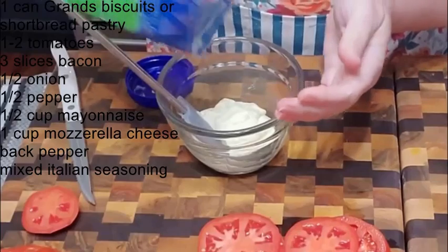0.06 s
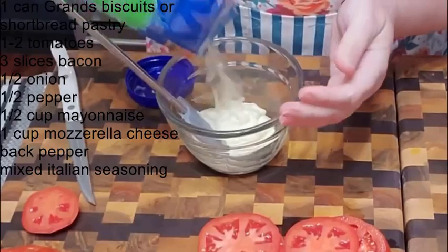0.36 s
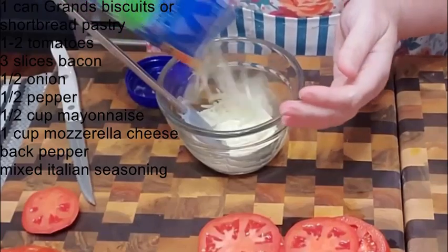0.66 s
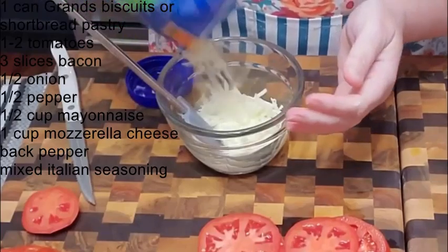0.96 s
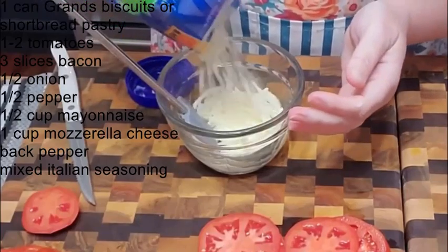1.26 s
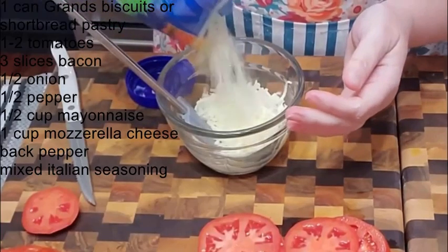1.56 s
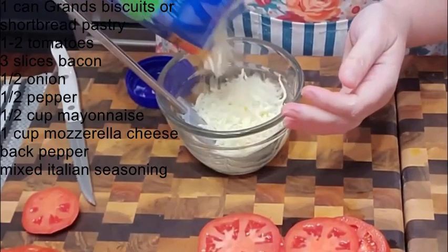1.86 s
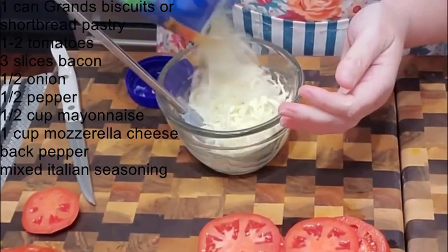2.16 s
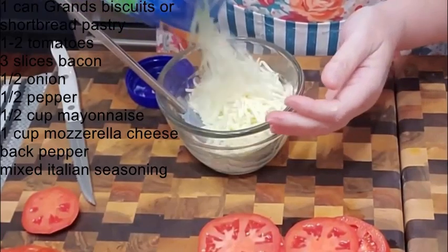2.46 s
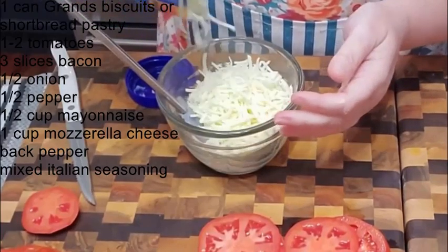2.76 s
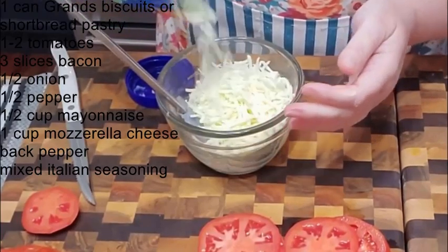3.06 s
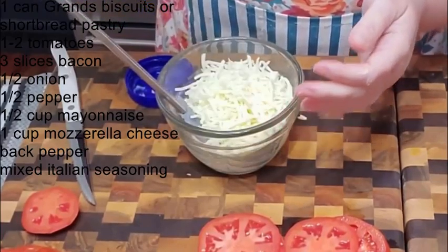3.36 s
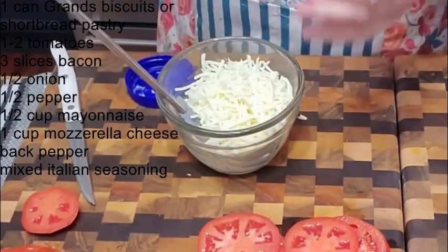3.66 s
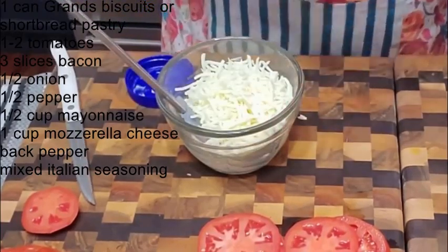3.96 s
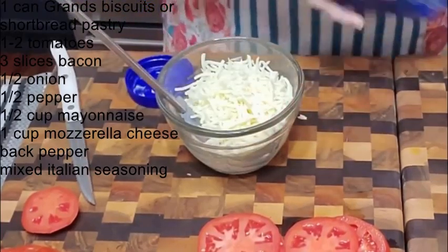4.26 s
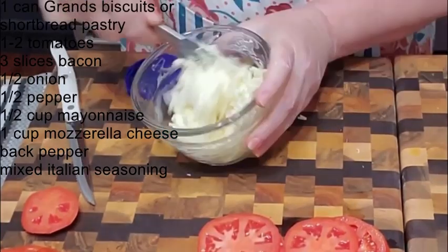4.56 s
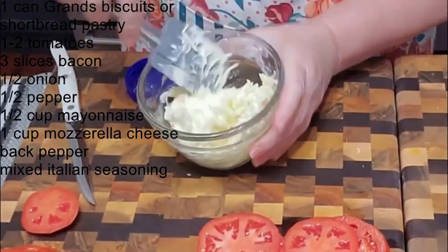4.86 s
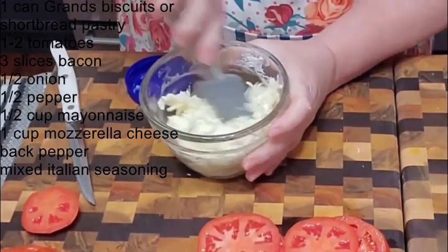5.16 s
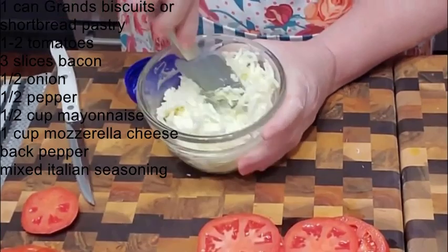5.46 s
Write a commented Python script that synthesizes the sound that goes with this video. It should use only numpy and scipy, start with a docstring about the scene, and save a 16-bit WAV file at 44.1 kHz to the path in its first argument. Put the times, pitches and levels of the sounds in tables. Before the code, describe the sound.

A kitchen appliance hums low and steady throughout. From the start until about 3.3 seconds, shredded cheese is shaken from a plastic bag close to the microphone: shreds slide and patter softly into a glass bowl in uneven surges, the plastic crinkles and pops, and a few clumps land with tiny thuds. The pouring thins out after 2.5 seconds. From about 3.5 seconds the bag is crumpled, with sharp crackles that peak just after 4 seconds, and it is set down with a crackly thud near 4.5 seconds. Faint sticky spatula strokes begin right after. At about 5 seconds the glass bowl knocks on a wooden board, the loudest sound, ringing briefly with a little room echo. The spatula keeps stirring the creamy mixture with a soft wet crackle and small smacks until the end, around 5.6 seconds.

```python
"""Shredded cheese is shaken from a plastic bag into a glass bowl of mayonnaise: shreds slide down the
film and patter, clumps thud, creases pop. The bag is crumpled and laid down close by. The tilted bowl
knocks on a wooden board and rings; a spatula stirs the sticky mixture with a wet crackle.
A kitchen appliance hums throughout."""
import sys
import numpy as np
from scipy import signal
from scipy.fft import rfft, irfft, next_fast_len
from scipy.io import wavfile

SR = 44100
rng = np.random.default_rng(int(sys.argv[2]) if len(sys.argv) > 2 else 0)


def file_out(sig):
    """Save sig as 16-bit WAV at sys.argv[1]."""
    # one column per channel
    cols = np.atleast_2d(sig).T
    # limit, then scale
    lim = np.clip(cols, -1, 1)
    pcm = np.round(lim * 32767).astype(np.int16)
    wavfile.write(sys.argv[1], SR, pcm)


N = 247092
TIME_S = np.arange(N) / SR

# stereo field: freq_hz, correlation
STEREO_CORRELATION = [(60, 0.8), (130, 1), (290, 0.69), (640, 0.62), (1400, 0.17), (3100, 0.095),
                      (6800, .02)]
# kitchen decay: freq_hz, t60_s
KITCHEN_T60 = [(150, 0.56), (400, 0.52), (1000, 0.61), (2800, 0.59), (10000, .3)]
# echo spectrum of the handling: freq_hz, level_db
ECHO_SPECTRUM = [(200, 7.5), (2000, 5.0), (12000, -4)]

# appliance air rush: freq_hz, level_db
AIR_SPECTRUM = [(15, -27), (25, -11.5), (123, -10.5), (141, -12), (185, -15), (309, -13.5), (754, -26),
                (988, -25.5), (1070, -32.5), (1160, -27.5), (1890, -24.5), (2050, -32), (2550, -32.5),
                (5140, -43), (16000, -46)]
# air boom around the main hum: centre_hz, width_hz, lift_db
AIR_BOOM = [(108, 20, 12)]
# motor hum: pitch_hz, level_db, wander_ratio
HUM_LINES = [(56.6, -59, .3), (60.5, -54, .2), (110.4, -47, 0.11), (182, -64, .6), (297.7, -59.5, 0.28),
             (360, -62.5, 1)]

# wet crackle: freq_hz, level_db
STIR_SPECTRUM = [(300, -15), (550, 0.5), (1300, -9), (1900, 0.5), (3300, -6), (3900, -4.5), (4400, -4.5),
                 (5400, -11), (7000, -14), (8500, -10), (16000, -16)]
# spatula strokes, and the bright wash after the bowl's knock: peak_s, hold_s, body_db, fizz_db
STROKES_AND_WASH = [(4.658, 0.009, -75, -68), (4.793, 0.038, -71, -69.5), (5.03, 0.11, -58, -64),
                    (5.236, 0.095, -60, -56.5), (5.505, 0.019, -55.5, -53.5)]
# sticky threads parting: start_s, level_db, centre_hz
THREAD_SMACKS = [(4.6533, -40.5, 9110), (5.2663, -40, 4020), (5.473, -54, 3430), (5.4994, -28, 7850),
                 (5.531, -29, 4340)]

# bowl landing and rocking once: start_s, level_db, low_hz, high_hz
BOWL_IMPACTS = [(4.968, -0.5, 887, 1520), (4.9713, -11, 870, 1290)]
# bowl and board modes: pitch_hz, relative_db, t60_s
BOWL_MODES = [(90, 2, 0.2), (166, -15.5, 0.86), (409, -3, 0.42), (600, -10, 0.41), (700, -8.5, 0.41),
              (759, -9.5, 0.64), (842, -1, 0.45), (947, 0, 0.56), (980, -2, 0.27), (1150, -13, 0.5),
              (1226, -8, 0.42), (1253, -8, 0.59), (1370, -10, 0.32), (1450, -25, 0.33), (1550, -7, 0.44),
              (1584, -3.5, 0.47), (1750, -17, 0.31), (2190, -19, .35), (2390, -4, 0.084), (2900, -27, 0.3),
              (2950, -21.5, 0.41), (3050, -20, 0.35)]
# echo spectrum of the knock: freq_hz, level_db
KNOCK_ECHO_SPECTRUM = [(70, -16), (100, -21), (140, -7.5), (330, -8.5), (430, -1.5), (750, -6), (930, 4),
                       (1100, -5), (1300, -7), (1700, -3), (2050, -18), (3100, -20), (3350, -31),
                       (9000, -49)]

# crumpling film: freq_hz, level_db
CRUMPLE_SPECTRUM = [(41, -38), (70, -2), (115, 1), (186, -8.5), (262, -1), (344, -6.5), (517, 1),
                    (1070, -9.5), (1250, -3), (1810, -2.5), (1930, -1.5), (2220, -3), (6750, -15),
                    (11600, -15.5), (16000, -20.5)]
# resonances that colour the rustle: centre_hz, width_hz, lift_db
RUSTLE_RESONANCES = [(532, 63, -0.5), (750, 100, 3), (1050, 160, 0), (1400, 310, 0.5), (1720, 140, 2),
                     (2280, 110, -0.5), (3620, 300, 1), (4450, 360, 2), (8670, 2300, 3), (11740, 520, 2.5)]
# grips on the bag: peak_s, rise_s, hold_s, fall_s, flex_db, hiss_db
BAG_GRIPS = [(3.564, 0.061, .13, 0.047, -44, -47.5), (3.738, 0.029, 0.024, 0.025, -40.5, -46),
             (3.783, .006, 0.0064, 0.091, -37, -38.5), (3.993, 0.014, 0.03, .03, -37.5, -37),
             (4.052, 0.014, 0.059, 0.11, -25.5, -24.5), (4.455, 0.018, 0.019, 0.0058, -24, -25.5)]
# bag settling on the counter: start_s, level_db
BAG_THUDS = [(4.091, -37), (4.451, -21), (4.465, -13.5)]
# loud creases flipping: start_s, pop_db, pitch_hz, crunch_db, snap_db
LOUD_CREASES = [(0.225, -32.5, 2230, -25, -17.5), (0.612, -32, 1950, -39, -49),
                (0.718, -36, 2000, -40, -52), (0.749, -32, 1670, -38.5, -44.5),
                (0.928, -33, 1690, -32.5, -50), (1.064, -19.5, 2240, -25.5, -47),
                (1.161, -27, 1590, -29, -25), (1.264, -28.5, 1770, -33, -38.5),
                (1.621, -34, 2280, -18.5, -27), (1.687, -31, 2390, -22.5, -46.5),
                (1.728, -24.5, 1950, -23, -43.5), (1.943, -35, 2030, -33, -45),
                (2.024, -37, 1830, -27.5, -37), (2.112, -28, 1760, -37, -53.5),
                (3.549, -26.5, 1940, -21.5, -47), (3.713, -24.5, 1270, -34, -37),
                (3.746, -24, 1550, -26, -30.5), (3.778, -25, 1400, -14.5, -12),
                (3.947, -34, 2320, -28, -43), (3.986, -34.5, 1670, -20, -15), (4.041, -14, 2200, -26, -13),
                (4.05, -13.5, 1350, -7, -2), (4.055, -11.5, 2180, -13, -13), (4.093, -21, 2150, -5, -12.5),
                (4.112, -34, 1750, -26, -6), (4.141, -31, 1290, -12, -10), (4.221, -24, 1600, -18, -7),
                (4.448, -17, 1610, -30, -6), (4.472, -26, 1980, -32, -3)]

# sliding shreds: freq_hz, level_db
POUR_SPECTRUM = [(150, -8), (250, -6), (292, 1), (325, -11.5), (360, 0), (400, -3.5), (557, -2),
                 (1010, -10.5), (1980, -5), (2710, -11.5), (3580, -12.5), (5730, -20), (8260, -21.5),
                 (15200, -26), (16000, -52)]
# shakes of the bag: peak_s, hold_s, shreds_db, hiss_db
BAG_SHAKES = [(0.236, 0.028, -43, -43), (0.362, .04, -47, -54), (0.524, 0.094, -50.5, -55.5),
              (0.745, 0.032, -46.5, -54), (0.947, 0.064, -43, -49), (1.171, 0.015, -39, -41),
              (1.292, 0.12, -49.5, -54), (1.64, 0.057, -46, -51), (1.732, 0.026, -41, -46.5),
              (1.967, 0.059, -48, -52.5), (2.135, .05, -47, -50), (2.351, 0.035, -51.5, -52.5),
              (2.841, 0.095, -55, -65.5), (3.091, 0.11, -53.5, -61), (3.262, 0.029, -57.5, -61)]
# clumps landing in the bowl: start_s, level_db, pitch_hz
CHEESE_CLUMPS = [(0.546, -38, 700), (1.136, -40, 800), (2.742, -39.5, 800), (3.118, -42, 1550),
                 (3.1443, -35, 623)]


def from_db(db):
    """Decibels to gain."""
    return 10 ** (np.asarray(db) / 20)


def rms(x):
    """Root mean square."""
    return np.sqrt(np.mean(x ** 2) + 1e-20)


def at_hz(table, hz):
    """Table lookup on a log-frequency axis."""
    freqs_hz, values = np.array(table).T
    return np.interp(np.log(hz + 1e-9), np.log(freqs_hz), values)


def band(x, low_hz, high_hz, order=2):
    """Causal band-pass."""
    sos = signal.butter(order, [low_hz, min(high_hz, .45 * SR)], "band", fs=SR, output="sos")
    return signal.sosfilt(sos, x)


def add(out, start_s, sound):
    """Mix a sound in at start_s."""
    start = max(round(start_s * SR), 0)
    out[:, start:start + sound.shape[-1]] += sound[..., :N - start]


def pan(x, left_db):
    """Left level over right."""
    return x * from_db([[left_db / 2], [-left_db / 2]])


def drift(rate_hz):
    """Slow random curve, unit variance."""
    knots = rng.standard_normal(int(N / SR * rate_hz) + 3)
    return np.interp(TIME_S * rate_hz, np.arange(len(knots)), knots) / np.sqrt(2 / 3)


def shape_stereo(pair, spectrum, modes=()):
    """Two independent noises to shaped stereo, correlated in the bass."""
    size = next_fast_len(pair.shape[1])
    hz = np.fft.rfftfreq(size, 1 / SR)
    lift_db = sum(db / (1 + (2 * (hz - centre_hz) / width_hz) ** 2) for centre_hz, width_hz, db in modes)
    mid, side = rfft(pair, size) * from_db(at_hz(spectrum, hz) + lift_db)
    correlation = np.clip(at_hz(STEREO_CORRELATION, hz), -1, 1)
    stereo = np.sqrt(1 + correlation) * mid + np.sqrt(1 - correlation) * side * [[1], [-1]]
    return irfft(stereo, size)[:, :pair.shape[1]]


def ring(hz, decay_s):
    """Struck resonance."""
    t = TIME_S[:SR // 20]
    return np.sin(2 * np.pi * hz * t) * np.exp(-t / decay_s)


def burst(low_hz, high_hz, span_s):
    """Tiny slips: noise swells to a peak near one at about half of span_s, then dies."""
    age = TIME_S[:SR // 12] / (span_s * 0.51)
    envelope = age * np.exp(1 - age)
    noise = shape_stereo(rng.standard_normal((2, len(age))), spectrum=[(1, 0)])
    sound = band(noise * envelope, low_hz, high_hz)
    return 0.31 * sound * rms(envelope) / rms(sound)


def stroke(peak_s, rise_s, hold_s, fall_s, body_db, hiss_db):
    """Body and hiss power of one swell; hiss grows faster with speed."""
    rise = np.maximum(peak_s - TIME_S, 0) / rise_s
    fall = np.maximum(TIME_S - peak_s - hold_s, 0) / fall_s
    speed = np.exp(-np.minimum(rise + fall, 20))
    return np.array([from_db(body_db) * speed, from_db(hiss_db) * speed ** 1.14]) ** 2


def rustle(power, spectrum, slips_per_s, grain_s, smooth_ratio, modes=()):
    """Uneven slips over smooth sliding noise; body and hiss each follow their own power."""
    slips = (rng.random(N) < slips_per_s / SR) * rng.exponential(1, N)
    slip_power = signal.lfilter([1], [1, -np.exp(-1 / (grain_s * SR))], slips + 1e-12)
    grain = np.sqrt(slip_power / slip_power.mean() + smooth_ratio)
    sound = shape_stereo(rng.standard_normal((2, N)) * grain, spectrum, modes)
    body = signal.sosfiltfilt(signal.butter(3, 3500, fs=SR, output="sos"), sound)
    hiss = sound - body
    return sum(gain * part / rms(part.mean(axis=0)) for gain, part in zip(np.sqrt(power), (body, hiss)))


def room_tail(spectrum):
    """Diffuse kitchen echo, unit energy; each octave has its own decay."""
    t = TIME_S[:SR]
    noise = shape_stereo(rng.standard_normal((2, SR)), spectrum)
    edges_hz = np.geomspace(70, 18000, 9)
    tail = np.zeros((2, SR))
    for k, (low_hz, high_hz) in enumerate(zip(edges_hz, edges_hz[1:])):
        t60_s = at_hz(KITCHEN_T60, np.sqrt(low_hz * high_hz))
        tail += (-1) ** k * band(noise, low_hz, high_hz) * from_db(-60 * t / t60_s)
    tail *= 1 - np.exp(-t / 0.0012)
    return tail / np.sqrt(np.sum(tail ** 2) / 2)


def appliance():
    """Wandering motor hum in a soft, booming air rush."""
    air = shape_stereo(rng.standard_normal((2, N)), AIR_SPECTRUM, AIR_BOOM)
    out = from_db(-58.5) * air / rms(band(air.mean(axis=0), 378, 2500))
    for hz, db, wander_ratio in HUM_LINES:
        wander = (drift(12) + 1j * drift(15)) / np.sqrt(2)
        phasor = (1 + wander_ratio * wander) / np.hypot(1, wander_ratio)
        out += from_db(db) * np.sqrt(2) * np.real(phasor * np.exp(2j * np.pi * hz * TIME_S))
    return pan(out, left_db=-2.5)


def stirring_and_wash():
    """The stirred mixture crackles, sticky threads smack; a bright wash follows the bowl's knock."""
    rise_s, fall_s = 0.077, 0.079
    power = sum(stroke(peak_s, rise_s, hold_s, fall_s, body_db, fizz_db)
                for peak_s, hold_s, body_db, fizz_db in STROKES_AND_WASH)
    out = rustle(power, STIR_SPECTRUM, slips_per_s=100, grain_s=0.0011, smooth_ratio=1.8)
    for start_s, db, hz in THREAD_SMACKS:
        add(out, start_s, from_db(db) * burst(hz * 0.81, hz * 1.28, span_s=0.0024))
    return out


def bowl_knock():
    """Full glass on wood: dull double impact, short ring, kitchen echo."""
    out = np.zeros((2, N))
    t = TIME_S[:SR]
    landing_s, ring_db = BOWL_IMPACTS[0][0], -27.5
    for start_s, db, low_hz, high_hz in BOWL_IMPACTS:
        blow = band(signal.unit_impulse(SR // 20), low_hz, high_hz, order=3)
        add(out, start_s, -from_db(db) * blow / np.abs(blow).max())
    for k, (hz, db, t60_s) in enumerate(BOWL_MODES):
        stereo_phase_rad = rng.normal(0, 0.66) * np.array([[1], [-1]])
        swing = (-1) ** k * np.sin(2 * np.pi * hz * t + stereo_phase_rad)
        add(out, landing_s, swing * from_db(ring_db + db - 60 * t / t60_s))
    add(out, landing_s, from_db(-36) * burst(2500, 13000, span_s=0.001))
    add(out, landing_s + 0.0034, from_db(10.5) * room_tail(KNOCK_ECHO_SPECTRUM))
    return pan(out, left_db=-1.5)


def bag_crumple():
    """The emptied bag crumples, drags and settles on the counter."""
    power = sum(stroke(*grip) for grip in BAG_GRIPS)
    out = rustle(power, CRUMPLE_SPECTRUM, slips_per_s=720, grain_s=0.00086, smooth_ratio=2.0,
                 modes=RUSTLE_RESONANCES)
    for start_s, db in BAG_THUDS:
        add(out, start_s, from_db(db) * burst(31, 260, span_s=0.0045))
    return out


def film_pop(hz):
    """A film panel flips and rings in two modes."""
    return ring(hz, decay_s=0.0019) + 0.38 * ring(hz * 0.654, decay_s=0.0013)


def loud_creases():
    """A panel pops, its fold crunches and snaps, loose film flutters."""
    out = np.zeros((2, N))
    for start_s, pop_db, hz, crunch_db, snap_db in LOUD_CREASES:
        crunch = burst(2700, 4380, span_s=0.0024)
        flutter = from_db(-7.5) * burst(540, 2800, span_s=0.0041)
        snap = burst(5900, 14800, span_s=0.0019)
        add(out, start_s, from_db(pop_db) * film_pop(hz))
        add(out, start_s, from_db(crunch_db) * (crunch + flutter) + from_db(snap_db) * snap)
    return out


def small_creases(flow, pops_per_s, over_flow_db):
    """Faint random film pops, scaled by the flow of shreds."""
    out = np.zeros((2, N))
    onsets = np.flatnonzero(rng.random(N) < pops_per_s / SR)
    pitch_hz = 1920 * np.exp(0.085 * rng.standard_normal(N))
    for i in onsets:
        add(out, i / SR, from_db(over_flow_db) * flow[i] * film_pop(pitch_hz[i]))
    return out


def shred_patter(ticks_per_s, spread_db, decay_cycles):
    """Single shreds tick on film, glass and each other; unit rms."""
    pitches_hz = np.geomspace(1200, 4200, num=14)
    onsets = rng.random(N) < ticks_per_s / SR
    hits = onsets * from_db(spread_db * np.minimum(rng.exponential(1, N), 2))
    pitch_index = rng.integers(0, len(pitches_hz), N)
    out = np.zeros((2, N))
    for k, hz in enumerate(pitches_hz):
        tick = ring(hz, decay_cycles / hz) * from_db(at_hz(POUR_SPECTRUM, hz)) * np.sqrt(hz)
        ticks = signal.oaconvolve(hits * (pitch_index == k), tick)[:N]
        out += pan(ticks, left_db=rng.normal(0, 4.0))
    return out / rms(out)


def cheese_pour():
    """Shreds trickle down the film, surge with each shake and patter into the bowl; clumps thud."""
    rise_s, fall_s = 0.032, 0.084
    trickle = stroke(0, rise_s, hold_s=2.44, fall_s=fall_s, body_db=-55, hiss_db=-69.5)
    shakes = sum(stroke(peak_s, rise_s, hold_s, fall_s, shreds_db, hiss_db)
                 for peak_s, hold_s, shreds_db, hiss_db in BAG_SHAKES)
    power = trickle + shakes
    out = rustle(power, POUR_SPECTRUM, slips_per_s=480, grain_s=0.0021, smooth_ratio=1.0,
                 modes=RUSTLE_RESONANCES)
    flow = np.sqrt(power[0])
    out += from_db(-5.5) * flow * shred_patter(ticks_per_s=90, spread_db=4, decay_cycles=3)
    out += small_creases(flow, pops_per_s=11, over_flow_db=5)
    for start_s, db, hz in CHEESE_CLUMPS:
        add(out, start_s, from_db(db) * ring(hz, decay_s=0.0016))
        add(out, start_s, from_db(db + 4.5) * burst(380, 1800, span_s=0.0053))  # loose shreds settle
    return pan(out, left_db=-1.0)


def scene():
    """Close handling with faint echo, plus knock and hum."""
    handling = cheese_pour() + bag_crumple() + loud_creases() + stirring_and_wash()
    echo = signal.fftconvolve(handling, room_tail(ECHO_SPECTRUM), axes=1)[:, :N]
    return handling + from_db(-43.5) * echo + bowl_knock() + appliance()


def record(dry):
    """Clip at full scale, then steep low-pass."""
    cutoff_hz = 16050
    lowpass = signal.ellip(12, .1, 80, cutoff_hz, fs=SR, output="sos")
    return signal.sosfilt(lowpass, np.clip(dry, -1, 1))


dry = scene()
out = record(dry)
file_out(out)
```